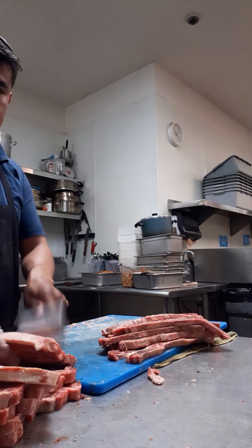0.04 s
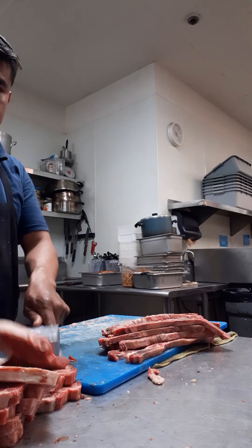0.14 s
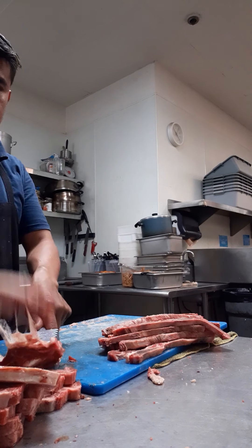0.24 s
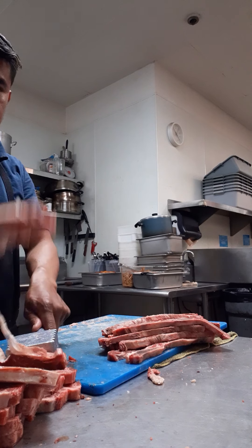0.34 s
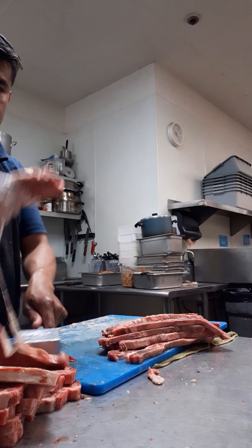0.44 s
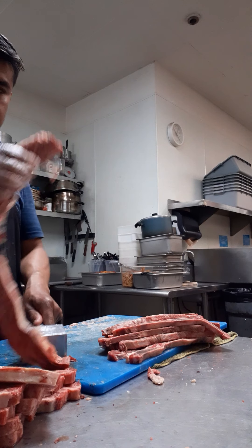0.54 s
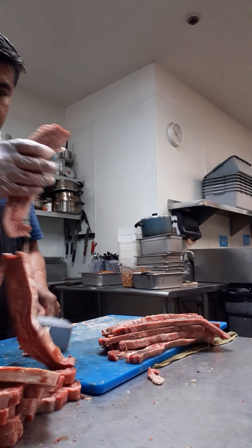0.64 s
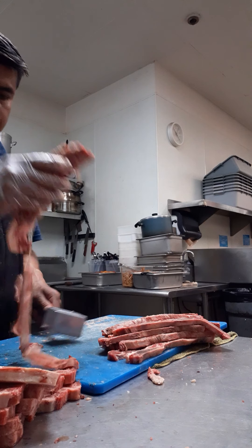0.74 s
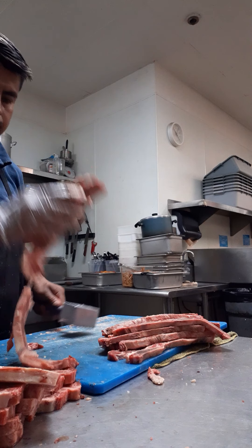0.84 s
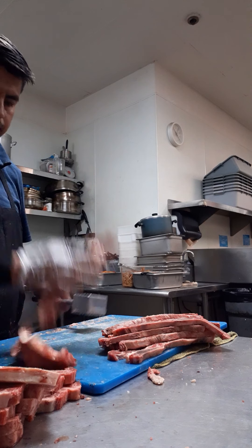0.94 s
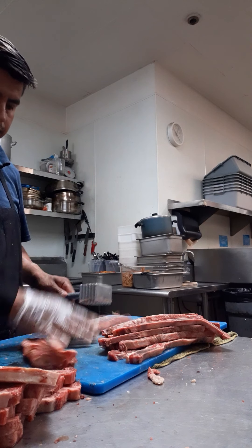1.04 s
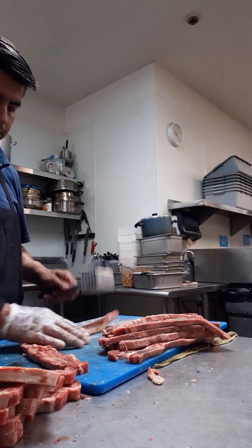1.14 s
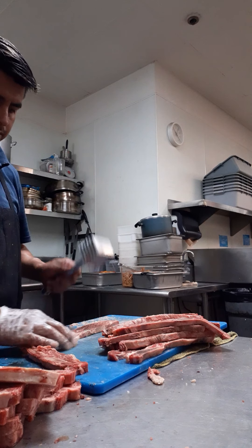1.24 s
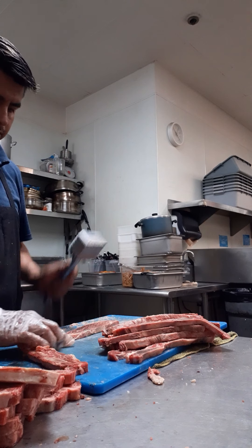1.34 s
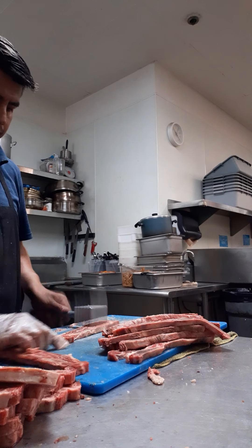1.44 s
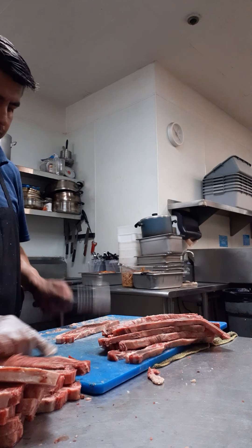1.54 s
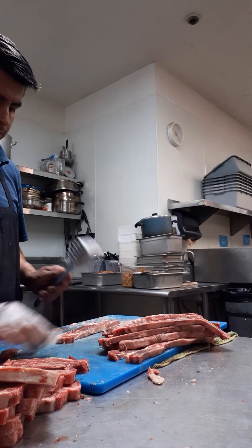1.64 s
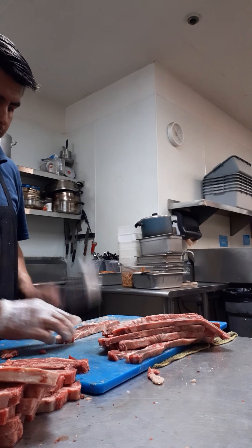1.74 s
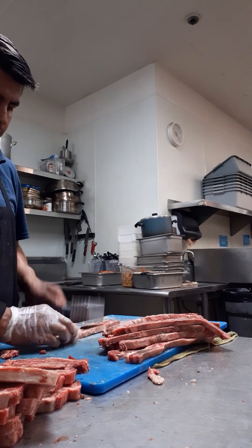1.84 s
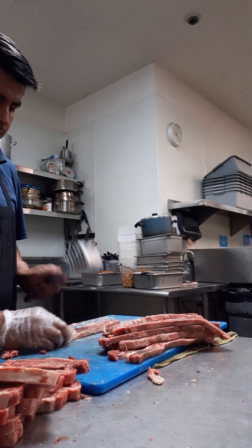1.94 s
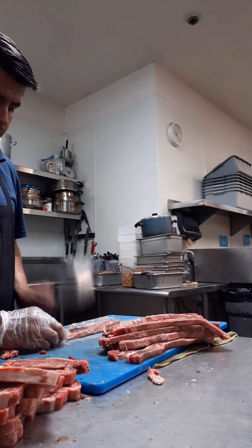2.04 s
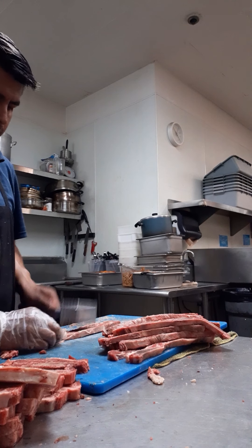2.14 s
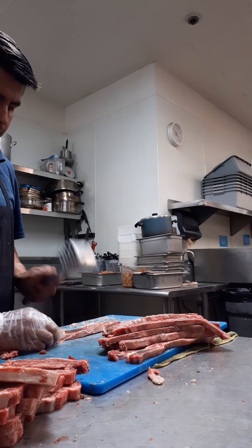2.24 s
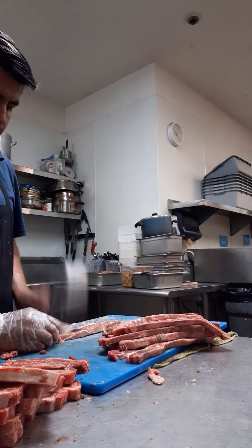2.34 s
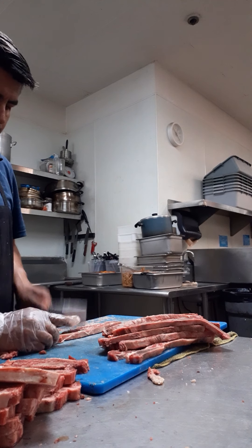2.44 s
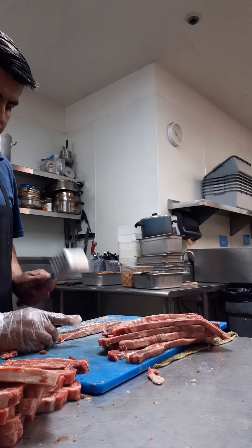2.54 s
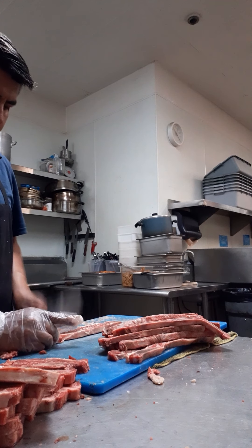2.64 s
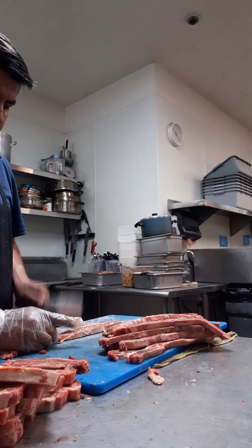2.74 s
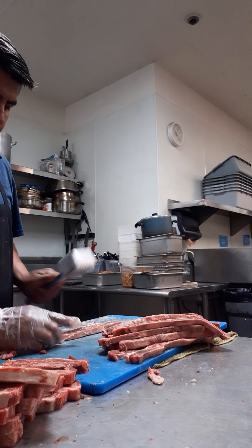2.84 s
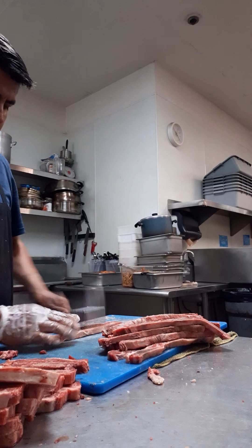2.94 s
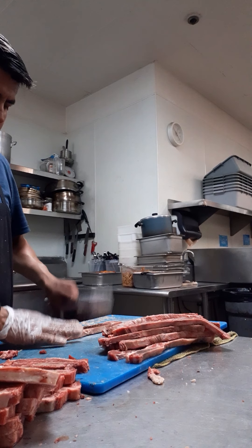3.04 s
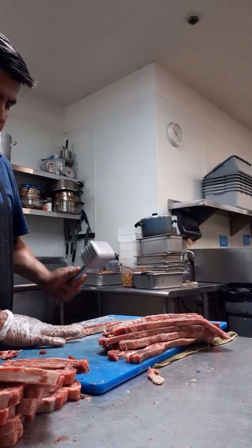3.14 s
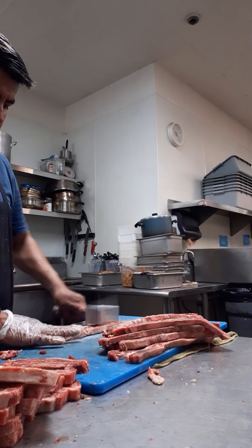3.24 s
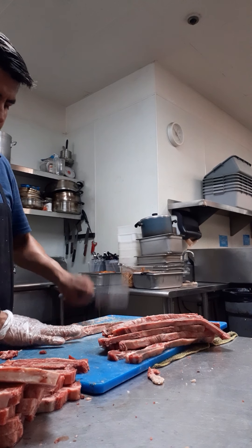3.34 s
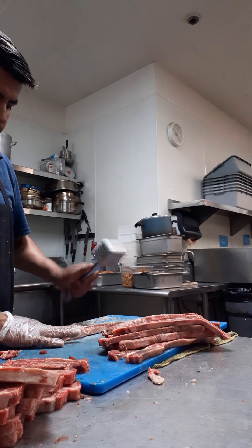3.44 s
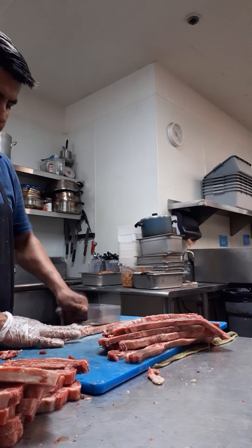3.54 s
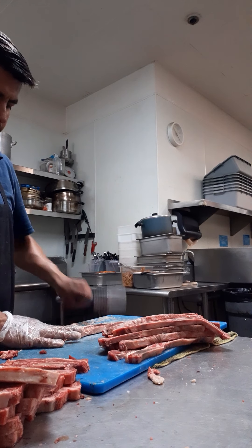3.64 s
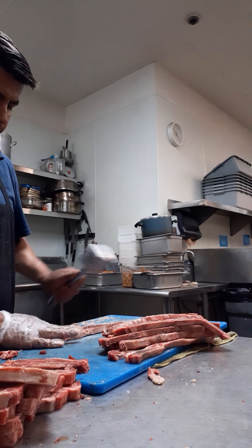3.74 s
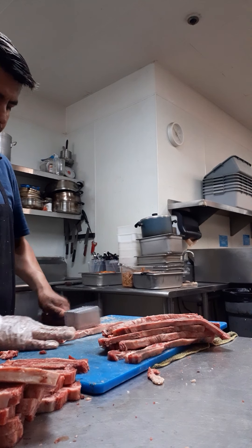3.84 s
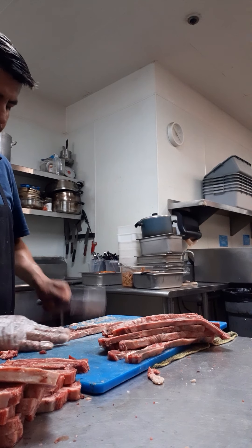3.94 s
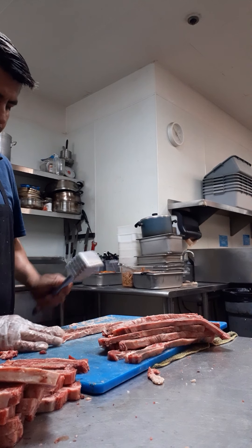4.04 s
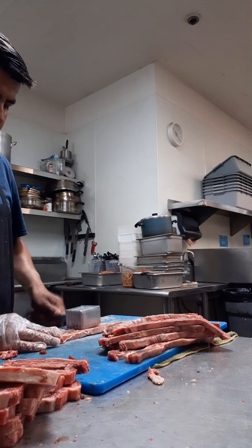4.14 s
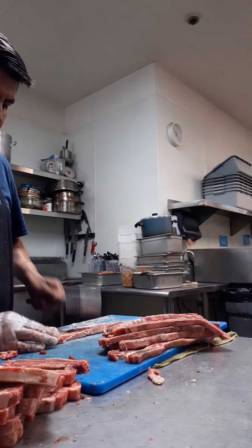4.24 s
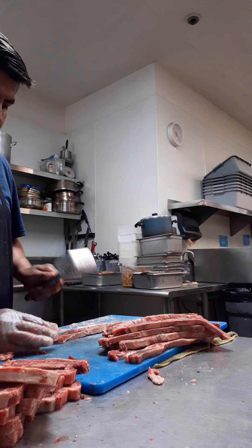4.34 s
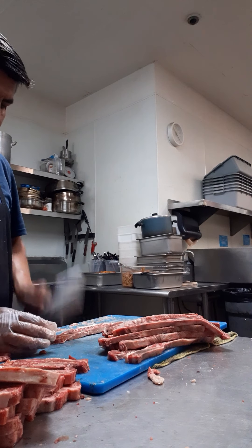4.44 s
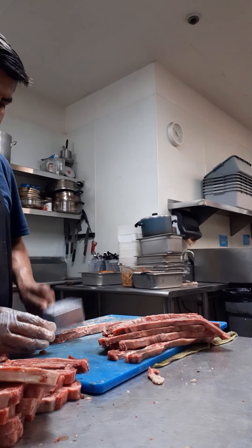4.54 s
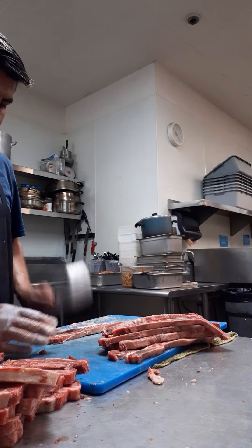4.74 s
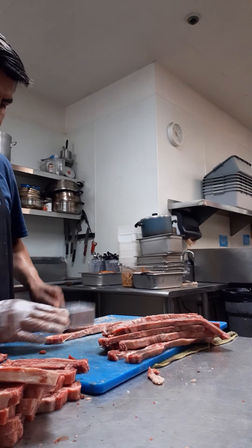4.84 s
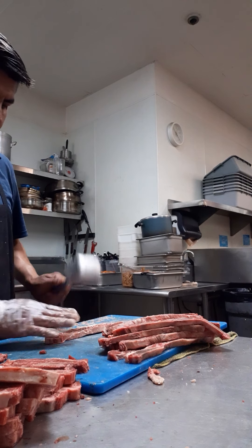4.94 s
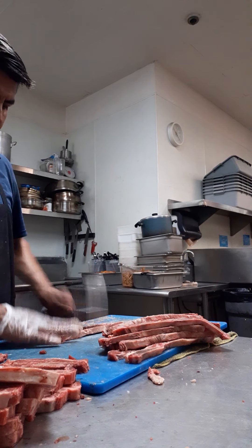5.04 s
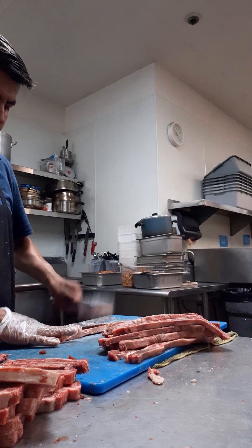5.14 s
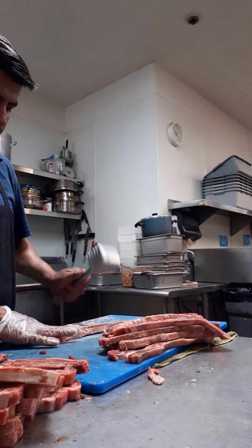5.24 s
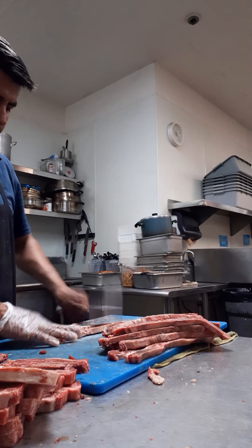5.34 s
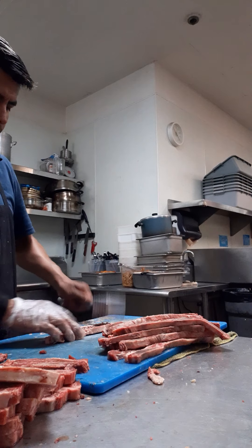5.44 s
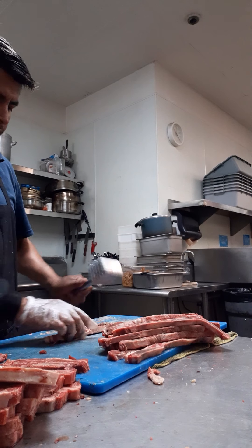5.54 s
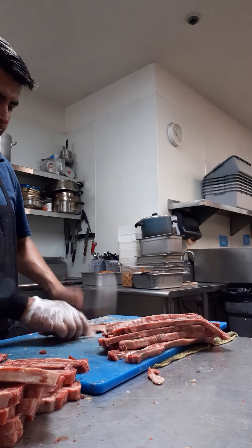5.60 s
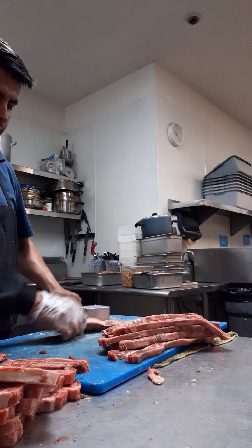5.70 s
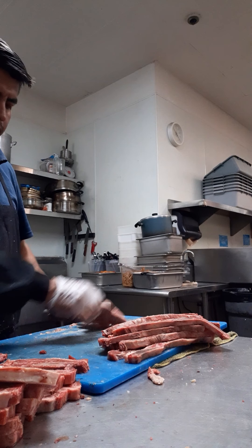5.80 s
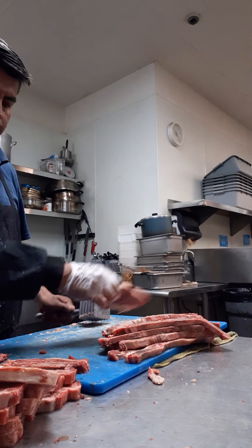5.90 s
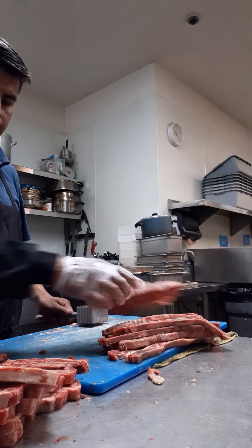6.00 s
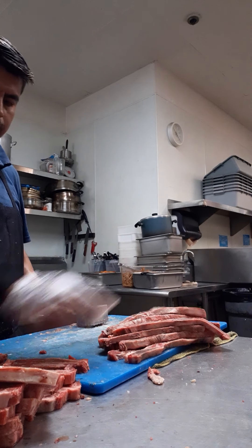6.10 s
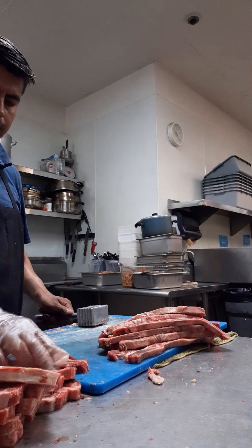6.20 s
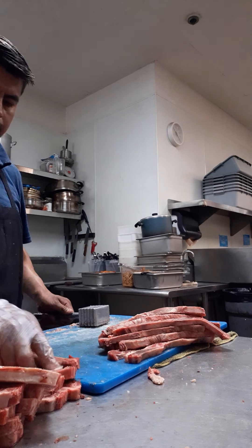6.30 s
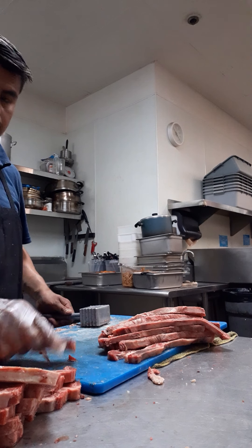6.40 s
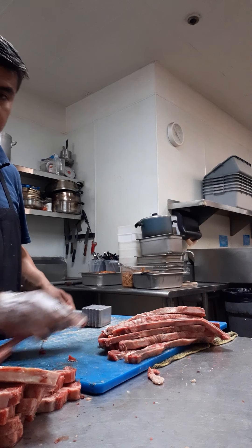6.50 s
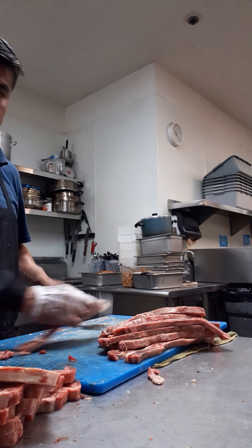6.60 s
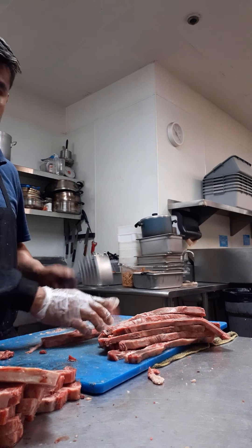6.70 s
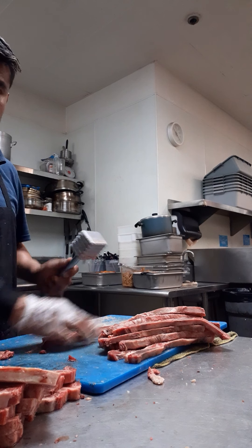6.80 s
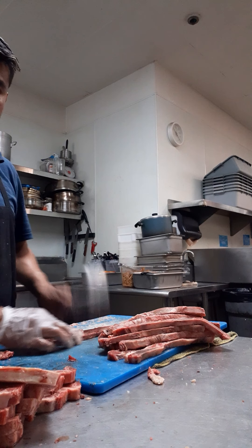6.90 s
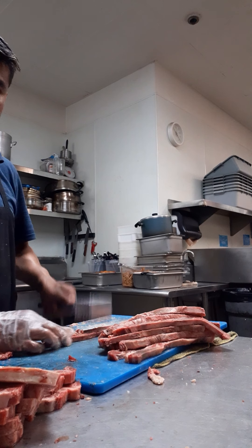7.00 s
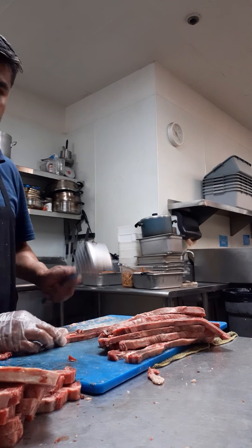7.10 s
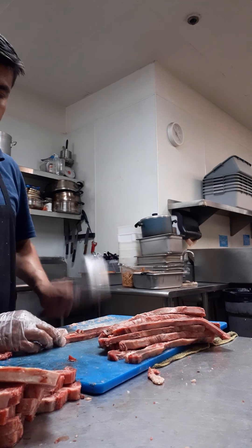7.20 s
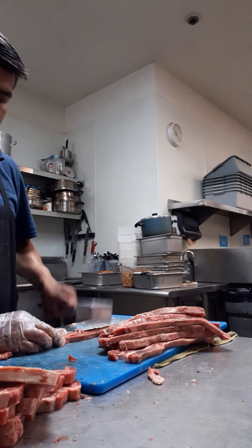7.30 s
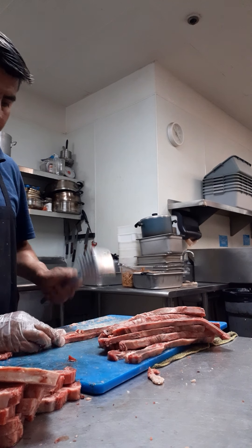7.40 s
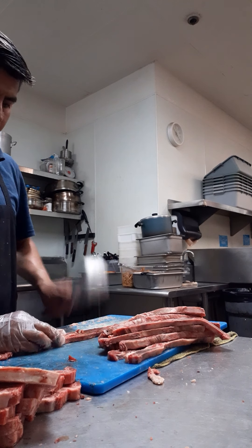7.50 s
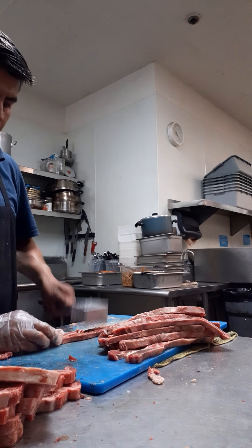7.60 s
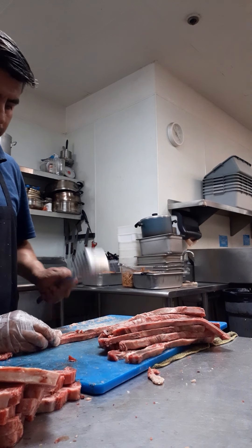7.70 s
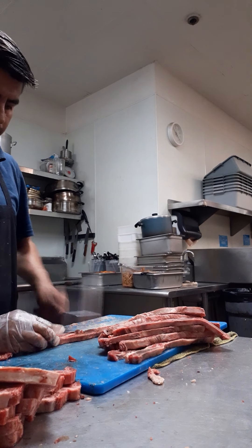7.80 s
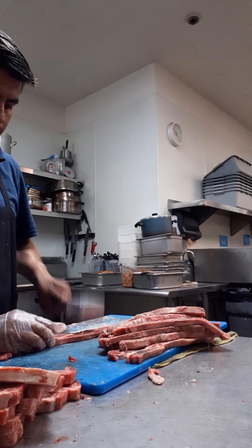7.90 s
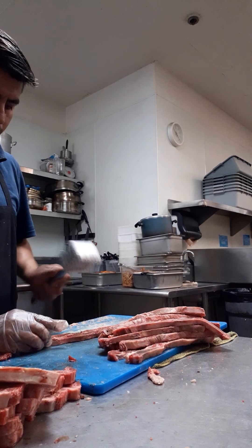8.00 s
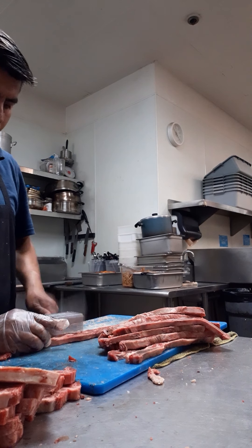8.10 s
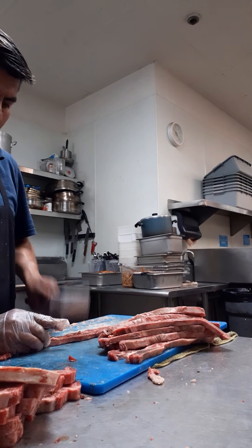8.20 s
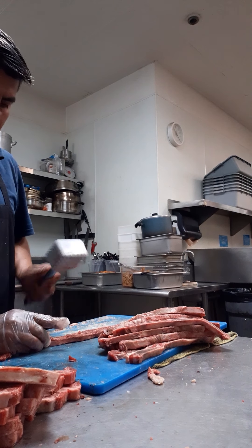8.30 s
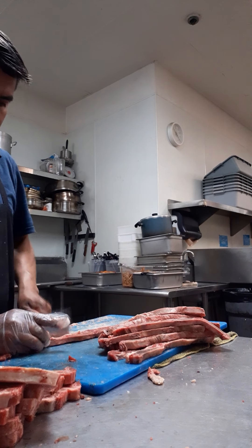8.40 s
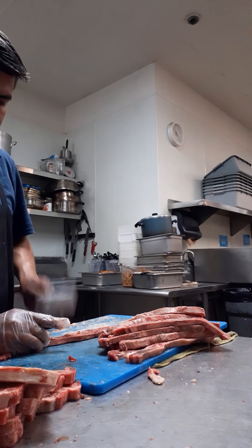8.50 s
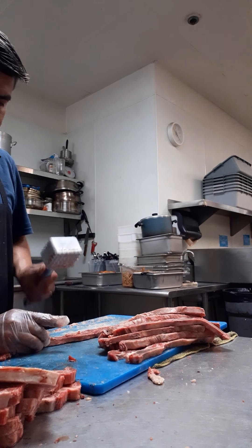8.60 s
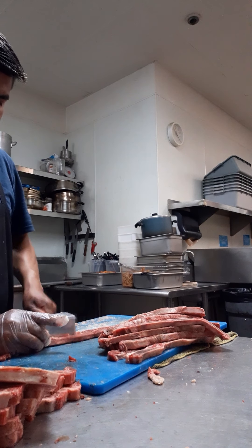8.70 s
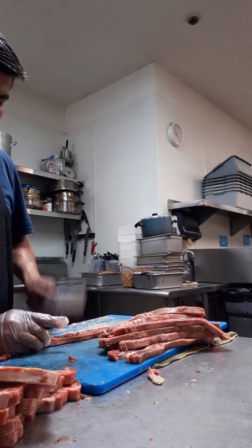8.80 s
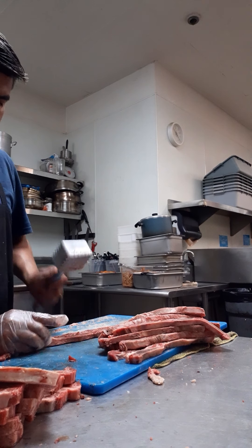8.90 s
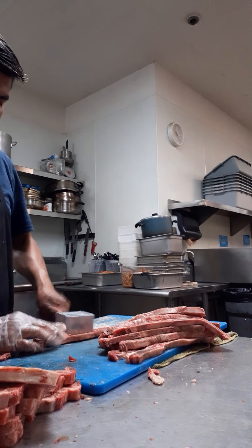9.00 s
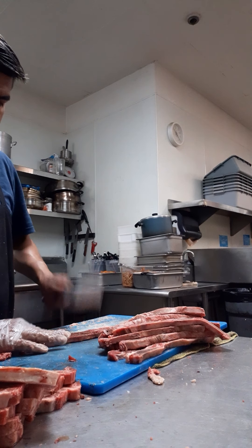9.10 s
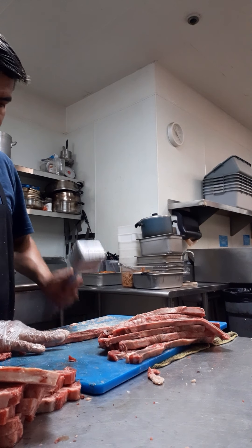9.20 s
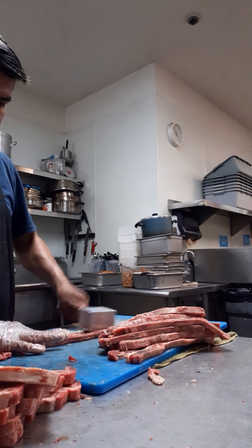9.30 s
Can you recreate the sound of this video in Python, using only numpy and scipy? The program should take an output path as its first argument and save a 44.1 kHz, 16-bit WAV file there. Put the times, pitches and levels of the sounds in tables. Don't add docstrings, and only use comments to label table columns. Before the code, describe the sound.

Fan hum, one opening blow, wet slaps and glove crinkle, then regular mallet smacks on meat with low table thumps and a rattling board.

```python
import sys
import numpy as np
from scipy import signal
from scipy.fft import rfft, irfft, next_fast_len
from scipy.io import wavfile
from scipy.ndimage import uniform_filter1d

SR = 44100
rng = np.random.default_rng(int(sys.argv[2]) if len(sys.argv) > 2 else 0)


def put_to_file(sound):
    columns = np.atleast_2d(sound).T
    safe = np.clip(columns, -1, 1)
    whole_steps = np.round(safe * 32767)
    wavfile.write(sys.argv[1], SR, whole_steps.astype(np.int16))


def elevation(decibels):
    levels = np.asarray(decibels, float)
    return 10 ** (levels / 20)


N = 412335

# pitch_hz, level_db per Hz
AIRFLOW = [(20, -62), (50, -3), (90, 6), (200, 4.5), (280, 2), (345, 0.5), (560, 4.5), (680, -2),
           (800, -6.5), (1300, -12), (2400, -19), (4500, -28.5), (8000, -34.5), (15500, -36.5)]
# time_s, drone_db
DRONE_LEVEL = [(0, -45), (.12, -34), (.6, -28), (.9, -35), (1.3, -30.5), (1.9, -34.5), (2.5, -39.5),
               (3.2, -42.5), (4, -36.5), (4.7, -40.5), (5.9, -42.5), (6.15, -33), (6.5, -35), (6.7, -40.5),
               (7.6, -41.5), (8.2, -38.5), (9.35, -35.5)]
# pitch_hz, width_hz, level_db over airflow
WHISTLES = [
    (587, 10, -12),
    (4506, 25, -28),
    (6700, 200, -33),
    (165, 12, -9),
    (296, 12, -13),
]
# start_s, level_db, slap_hz, table_db, fizz_db
LIGHT_KNOCKS = [(.109, -17.5, 1500, -7.5, -36), (0.213, -15.5, 1490, -24, -44), (.84, -45, 2200, -50, -66),
                (1.002, -30.5, 1570, -43, -29), (1.02, -46, 3530, -50, -40), (1.071, -11.5, 1660, -15, -50),
                (1.222, -22, 2070, -40, -48), (1.62, -31, 2310, -43, -50), (6.066, -47, 3700, -60, -65),
                (6.115, -48, 1197, -60, -51), (6.217, -50, 5130, -60, -60), (6.262, -49, 5100, -64, -60),
                (6.477, -53, 5270, -64, -70), (6.554, -49, 5800, -64, -58), (6.566, -38, 1840, -50, -66),
                (6.775, -26.5, 1500, -48, -34), (6.978, -11.5, 1760, -25, -15),
                (7.289, -12, 1870, -16, -28)]
# pitch_hz, level_db per Hz
BOARD_BODY = [(150, -24.5), (250, -8), (320, -1), (380, -2.5), (440, 0.5), (520, 1), (630, -0.5), (750, -3),
              (950, -11.5), (1400, -19.5), (3000, -45)]
# start_s, smack_db (mallet tilt), thump_db, chatter_db
NEAR_BLOWS = [(1.489, -1.5, -17.5, -21), (1.8184, -8, -18, -18), (2.1198, -3, -14, -19),
              (2.4135, -8.5, -15, -17), (2.694, -15, -14, -19.5), (2.9932, -9, -14.5, -21),
              (3.2794, -5, -15.5, -20.5), (3.5812, -36, -15, -16.5), (3.88, -7, -14.5, -19),
              (4.1738, -9.5, -14, -17), (4.5162, -3.5, -16, -19.5), (4.8219, -8.5, -14.5, -20),
              (5.1018, -8, -14, -19), (5.395, -9, -13.5, -20.5), (5.6726, -8.5, -14.5, -22)]
# start_s, smack_db (mallet tilt), thump_db, chatter_db
FAR_BLOWS = [
    (0.1094, -1, -23, -25),
    (6.979, -18, -24, -24),
    (7.2881, 2.5, -28, -24),
    (7.5888, -28, -20, -22),
    (7.866, -9, -16, -20),
    (8.153, -29, -13, -20),
    (8.4506, -6, -16.5, -16),
    (8.7429, -8, -17, -20),
    (9.0321, -5, -14, -19.5),
    (9.325, -19, -16, -15.5),
]
# pitch_hz, level_db per Hz
CHATTER_COLOUR = [(500, -33.5), (900, 3), (1300, -1.5), (2000, -5.5), (2700, -10.5), (4500, -12.5),
                  (6200, -16.5), (7600, -22.5), (9300, -17.5), (12000, -22.5), (15500, -28)]
# pitch_hz, level_db, t60_s, first swing (1 up, -1 down)
NEAR_MODES = [(78.4, -14.9, 0.267, 1), (89.7, -9.8, 0.18, -1), (111.6, -33.5, 0.9, -1),
              (118.5, -20.1, 0.501, 1), (163.0, -20.7, 0.678, 1), (213.8, -4.1, 0.078, 1),
              (236.9, -26.1, 0.894, 1), (270.6, -5.1, 0.059, -1), (308.2, -17.1, 0.141, 1)]
FAR_MODES = [(71.3, -19.1, 0.377, 1), (82.7, -13.4, 0.179, -1), (104.4, -20.3, 0.576, 1),
             (114.4, -13.5, 0.356, 1), (162.3, -16.4, 0.474, -1), (199.9, -7.7, 0.08, -1),
             (212.2, -22.8, 0.342, -1), (239.3, -5.5, 0.065, 1), (283.4, -20.4, 0.26, -1)]
# pitch_hz, t60_s
ROOM_DECAY = [(200, 0.43), (560, 0.36), (1500, 0.37), (4000, 0.28), (10000, 0.18)]
# peak_s, level_db, rise_s, fall_s
GLOVE_MOVES = [
    (.216, -38, 0.027, .006),
    (.24, -49, .016, 0.29),
    (.468, -52, 0.14, .085),
    (6.226, -57, .036, .025),
    (6.258, -60, .022, .25),
]
# pitch_hz, shared part (0 to 1)
LIKENESS = [(30, .75), (100, .93), (350, .95), (700, .62), (1400, .22), (3000, .12), (12000, .1)]
# pitch_hz, right over left_db
RIGHT_OVER_LEFT = [(30, 3.2), (100, 1.8), (300, 1.9), (650, 4.4), (1500, 3.4), (5000, 3.8), (8500, -.6)]
# pitch_hz, level_db
MICROPHONE_COLOUR = [(20, -22), (45, 3.5), (70, 3), (12000, -2.5), (15000, -11.5), (15700, -11),
                     (16100, -30), (17000, -70)]

AIR_DB, AIR_SHARE = -44, 0.15
GAIN_EXTRA_DB, GAIN_SETTLES_S, GAIN_GLIDE_S = 3.5, 2.26, 0.27
PUFF_DB, PUFF_DB_PER_OCTAVE = -4, -2
LINGER_HZ, LINGER_WIDTH_HZ, LINGER_DB, LINGER_S = 2200, 1360, -17, 0.57
USUAL_CHATTER_DB, CHATTER_S = -20, 0.047
BOARD_DB, BOARD_SHARE = -13.5, 0.52
RUSTLE_SPAN_DB = 25
LAG_SAMPLES = 14


def evened(x):
    return x / np.sqrt(np.mean(x ** 2) + 1e-20)


def read(points, hz):
    f, value = np.transpose(points)
    return np.interp(np.log(hz + 1), np.log(f + 1), value)


def add(mix, s, sound):
    part = mix[..., round(s * SR):][..., :sound.shape[-1]]
    part += sound[..., :part.shape[-1]]


def resonate(x, hz, width):
    return signal.lfilter(*signal.iirpeak(hz, hz / width, SR), x)


def resonate_twice(x, hz, width):
    return evened(resonate(resonate(x, hz, width), hz, width))


def colour(x, points):
    log_gain = np.log(elevation(read(points, abs(np.fft.fftfreq(4096, 1 / SR)))))
    minimum_phase = -signal.hilbert(log_gain).imag
    taps = np.fft.ifft(np.exp(log_gain + 1j * minimum_phase)).real[None, :2048]
    return signal.oaconvolve(x, taps / np.linalg.norm(taps), axes=1)[:, :N]


def shape(x, response):
    size = next_fast_len(N + 4096)
    return irfft(response(np.fft.rfftfreq(size, 1 / SR), rfft(x, size)), size)[..., :N]


def fans():
    t, noise = np.arange(N) / SR, rng.standard_normal((3, 2, N))
    air = colour(noise[0], AIRFLOW)
    middle = signal.butter(4, [300, 1000], "bp", fs=SR, output="sos")
    air /= np.std(signal.sosfilt(middle, air))
    air += sum(elevation(db) * evened(resonate(noise[1], hz, width)) for hz, width, db in WHISTLES)
    flutter = resonate_twice(noise[2], 125, 53)
    wobble = 1.68 * np.sin(2 * np.pi * 1.3 * t)
    drone = 0.89 * np.sin(2 * np.pi * 134 * t + wobble) + 0.52 * flutter
    drone_db = np.interp(t, *np.transpose(DRONE_LEVEL))
    gain_db = GAIN_EXTRA_DB * (1 - np.tanh((t - GAIN_SETTLES_S) / GAIN_GLIDE_S)) / 2
    air_db = AIR_DB + gain_db + AIR_SHARE * (drone_db - drone_db.mean())
    return elevation(air_db) * air + elevation(drone_db) * drone


def knocks():
    out, body, sag = np.zeros((2, N)), np.zeros((2, N)), np.zeros(N)
    t = np.arange(16000) / SR
    fizz_band = signal.butter(2, [5500, 13000], "bp", fs=SR)
    for s, db, hz, table_db, fizz_db in LIGHT_KNOCKS:
        noise = rng.standard_normal((3, 2, 16000))
        slap = resonate_twice(noise[0], hz, 1900)
        add(out, s, elevation(db + 3 - 60 * t / 0.016) * slap)
        steel = resonate_twice(noise[0, ::-1], (hz + LINGER_HZ) / 2, LINGER_WIDTH_HZ)
        add(out, s, elevation(db + LINGER_DB - 60 * t / LINGER_S) * steel)
        fizz = evened(signal.lfilter(*fizz_band, noise[1]))
        add(out, s, elevation(fizz_db - 60 * t / 0.0034) * fizz)
        puff_db = db + PUFF_DB + PUFF_DB_PER_OCTAVE * np.log2(hz / LINGER_HZ)
        add(body, s, elevation(puff_db + 2.0 - 60 * t / 0.08) * noise[2])
        swing = np.minimum(t / 0.023, 1) * np.sin(2 * np.pi * 96 * t)
        add(sag, s, elevation(table_db - 9.5 - 60 * t / 0.39) * swing)
    return out + board(body), sag


def board(x):
    return elevation(1.5) * colour(x, BOARD_BODY)


def contact(blows):
    body, ticks, t = np.zeros((2, N)), np.zeros((2, N)), np.arange(8000) / SR
    hold = (1 - np.exp(-t / 0.004)) * elevation(-60 * np.maximum(t - 1.2 * CHATTER_S, 0) / 0.06)
    for s, smack_db, _, chatter_db in blows:
        noise = rng.standard_normal((2, 8000))
        size, chance = rng.exponential(1, 8000), rng.random(8000)
        body_db = BOARD_DB + BOARD_SHARE * (chatter_db - USUAL_CHATTER_DB)
        add(body, s, elevation(body_db - 5.0) * hold * noise)
        hits = elevation(3.4 * np.minimum(size, 3)) * (chance < 160 / SR)
        bursts = signal.lfilter([1], [1, -0.99], hits)
        bursts += 0.55
        add(ticks, s, elevation(chatter_db - 5.0) * hold * noise[::-1] * bursts)
        smack = np.minimum(t / 0.0015, 1) * noise
        add(ticks, s, elevation(smack_db - 2.5 - 60 * t / 0.014) * smack)
    return board(body), colour(ticks, CHATTER_COLOUR)


def table(blows, modes, lag_s):
    out, t = np.zeros(N), np.arange(SR // 2) / SR
    stray = rng.standard_normal((len(blows), len(modes), 2))
    for (s, _, thump_db, _), shifts in zip(blows, stray):
        ring = np.zeros(len(t))
        for (hz, mode_db, t60, swing), (louder, sharper) in zip(modes, shifts):
            level = np.sign(swing) * elevation(mode_db + 1.7 * louder - 60 * t / t60)
            ring += level * np.sin(2 * np.pi * hz * (1 + 0.0033 * sharper) * t)
        add(out, s + lag_s, elevation(thump_db + 11.5) * ring)
    return out


def elsewhere(x):
    return np.array([x, shape(x, lambda hz, z: -1j * z)])


def kitchen(x):
    hz, t, z = signal.stft(rng.standard_normal((2, SR)), SR, nperseg=256)
    decay = elevation(-60 * t / read(ROOM_DECAY, hz)[:, None])
    tail = signal.istft(z * decay, SR, nperseg=256)[1]
    tail = tail * np.clip(np.arange(tail.shape[1]) / SR / 0.0023 - 0.4, 0, 1)
    return signal.fftconvolve(x[None], tail / np.linalg.norm(tail[0]), axes=1)[:, :N]


def glove():
    out, t = np.zeros((2, N)), np.arange(N) / SR
    clumps_db = 2.5 * uniform_filter1d(rng.standard_normal(N), size=100) * 10
    grains = rng.standard_normal((2, N)) * elevation(clumps_db)
    crisp = signal.butter(2, [8000, 16000], "bp", fs=SR, output="sos")
    grains = evened(signal.sosfilt(crisp, grains))
    for s, db, rise, fall in GLOVE_MOVES:
        away = np.maximum((s - t) / rise, (t - s) / fall)
        out += elevation(db - RUSTLE_SPAN_DB * away) * grains
    return out


def ports(hz, pair):
    same = np.clip(read(LIKENESS, hz), 0, 1)
    tilt = elevation(read(RIGHT_OVER_LEFT, hz) / 2)
    delayed = pair[0] * np.exp(-2j * np.pi * hz * LAG_SAMPLES / SR)
    left = (same * delayed + np.sqrt(1 - same ** 2) * pair[1]) / tilt
    return np.array([left, pair[0] * tilt])


def scene():
    hum = fans()
    taps, sag = knocks()
    body, ticks = contact(NEAR_BLOWS + FAR_BLOWS)
    thump = table(NEAR_BLOWS, NEAR_MODES, 0.0027) + table(FAR_BLOWS, FAR_MODES, 0.000067) + sag
    sharp = ticks + taps + glove()
    echo = kitchen(elevation(-6.0) * body[0] + elevation(-7.5) * sharp[0] + elevation(-17.5) * thump)
    return shape(elsewhere(thump) + body + sharp + echo + hum, ports)


def top_cut(x):
    return signal.sosfilt(signal.butter(12, 15750, fs=SR, output="sos"), x)


def record(dry):
    heard = shape(dry, lambda hz, z: z * elevation(read(MICROPHONE_COLOUR, hz)))
    mix = np.tanh(heard * 1.116) / 0.9
    return top_cut(mix)


dry = scene()
out = record(dry)
put_to_file(out)
```